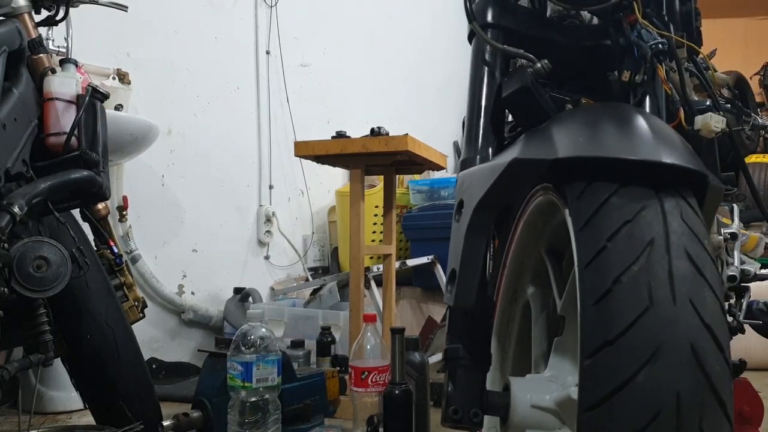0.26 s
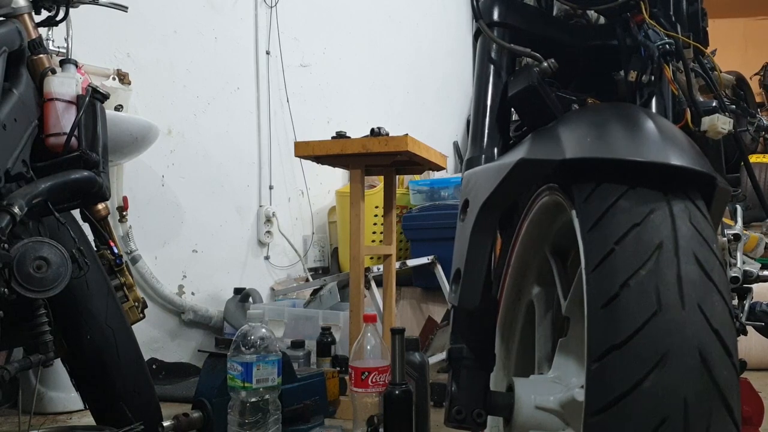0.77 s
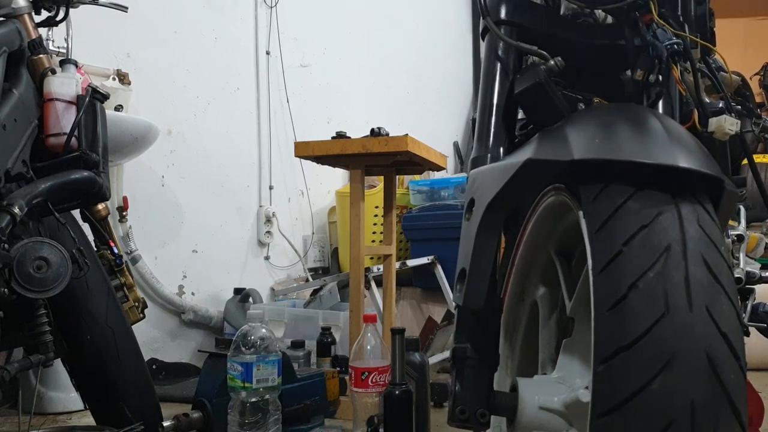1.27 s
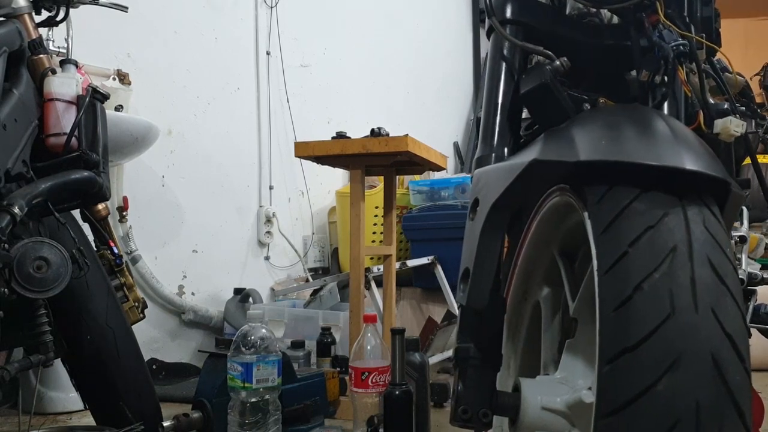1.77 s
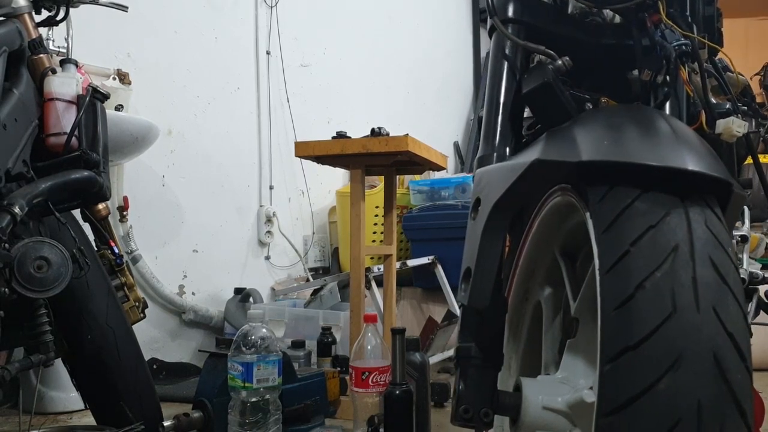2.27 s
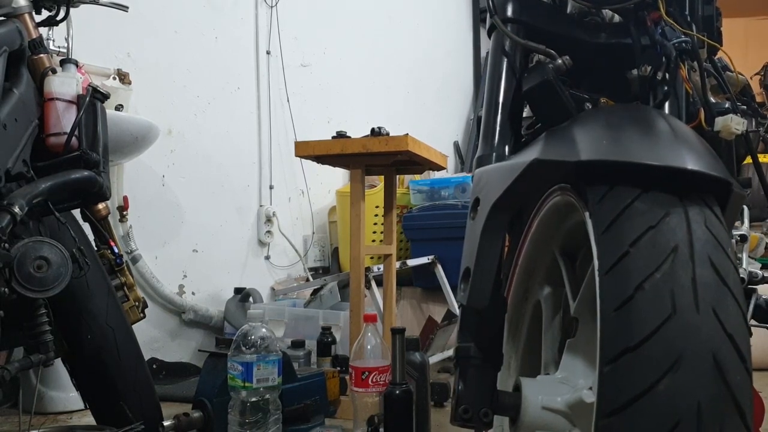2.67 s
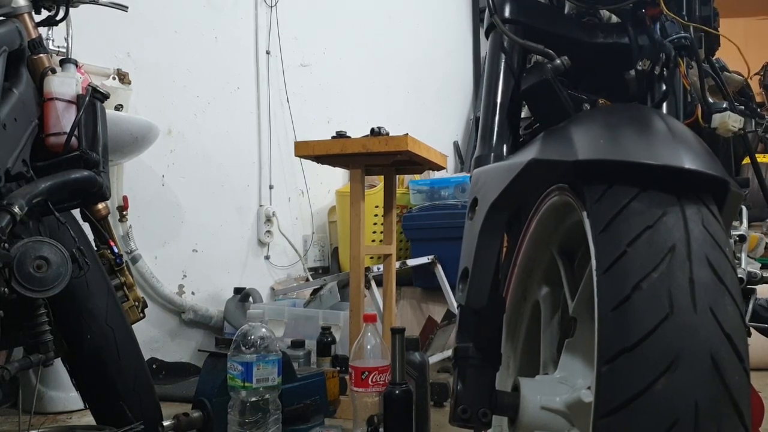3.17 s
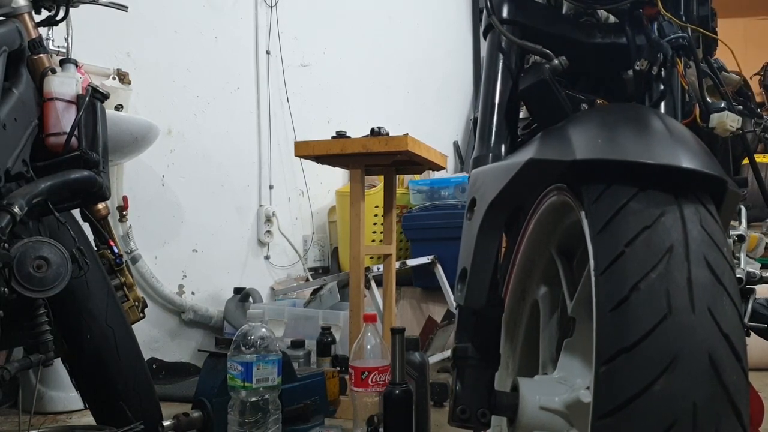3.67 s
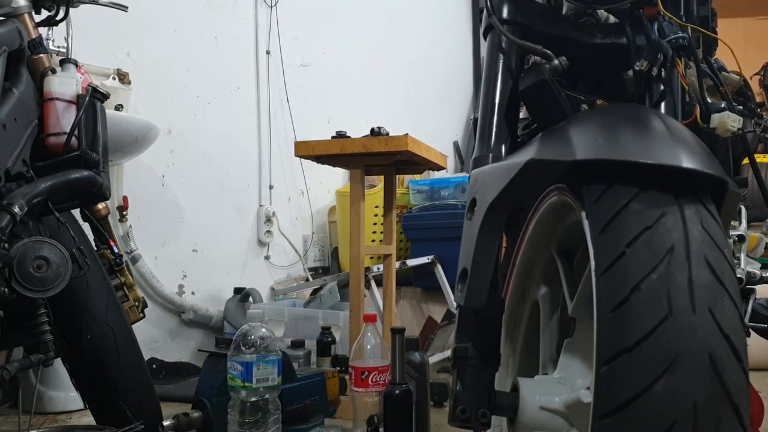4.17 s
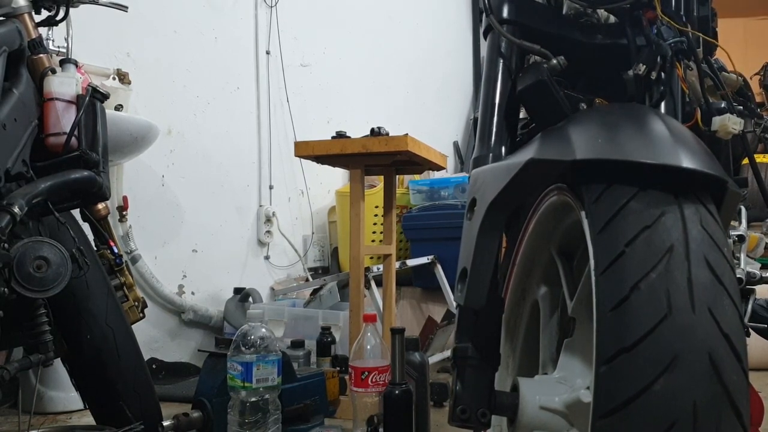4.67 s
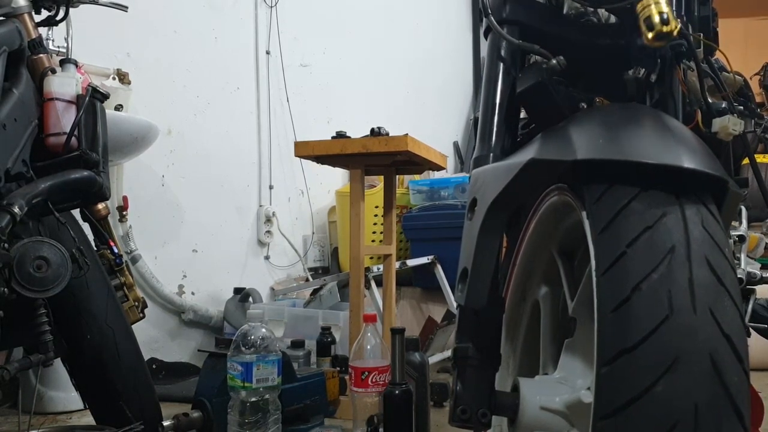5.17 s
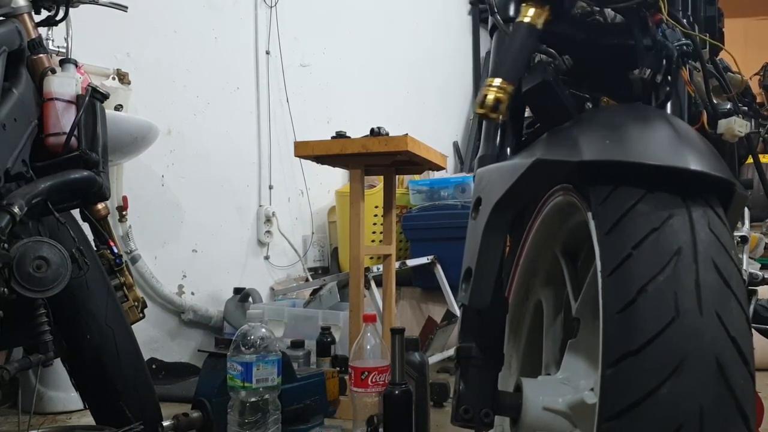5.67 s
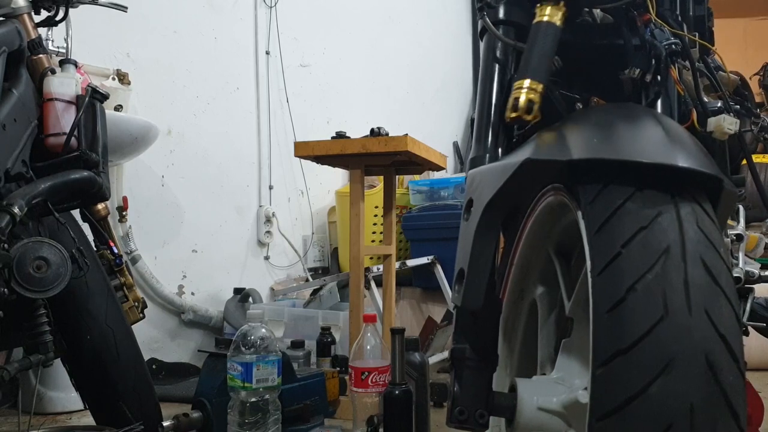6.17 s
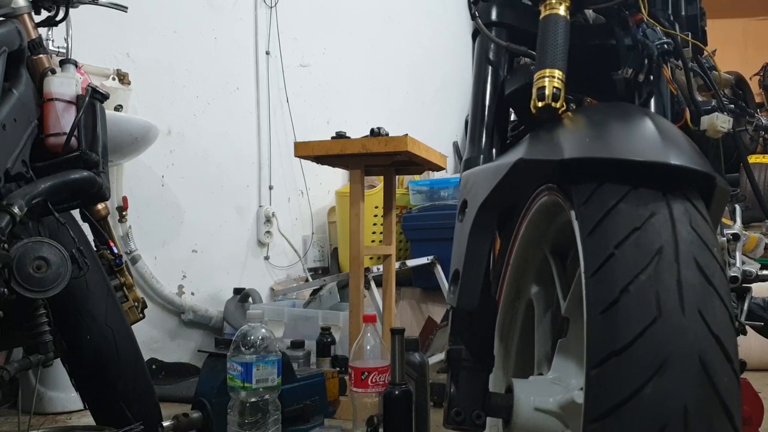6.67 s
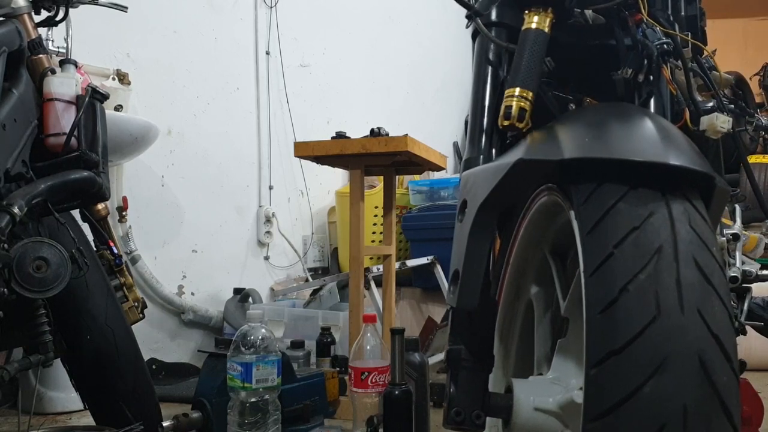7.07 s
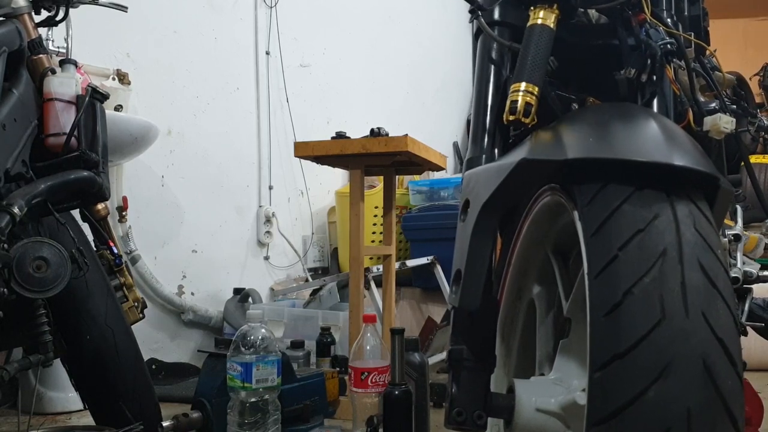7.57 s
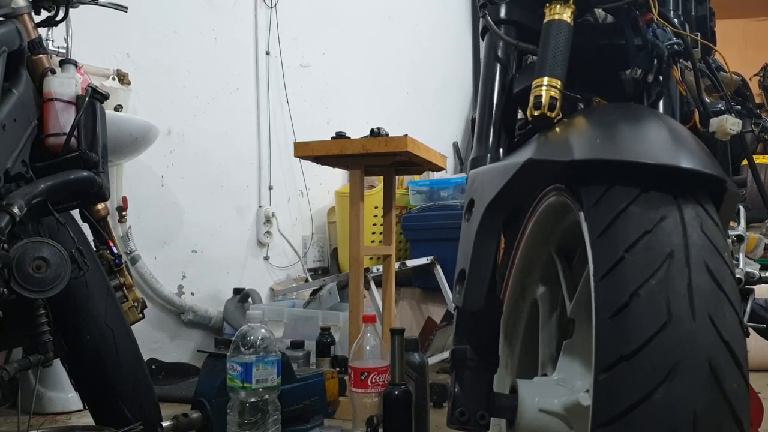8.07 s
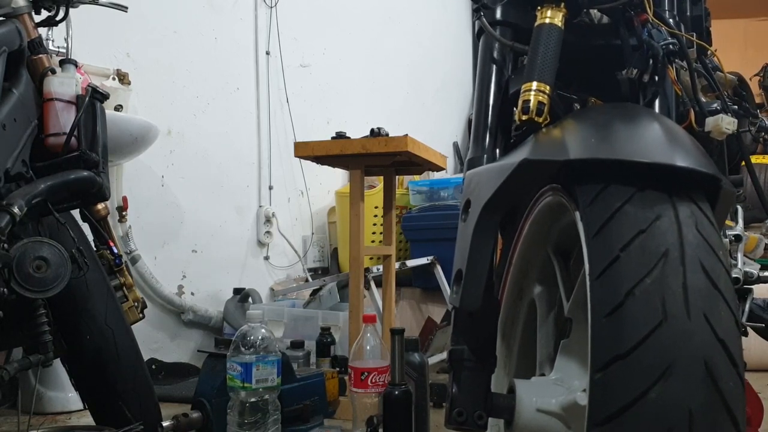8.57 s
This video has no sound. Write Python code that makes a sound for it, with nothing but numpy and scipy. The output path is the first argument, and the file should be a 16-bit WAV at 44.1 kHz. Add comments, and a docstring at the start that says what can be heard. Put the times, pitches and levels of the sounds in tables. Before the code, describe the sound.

Close in a hard-walled workshop, a motorcycle is handled with low bumps and knocks. The starter grinds and labours through compressions; the engine fires, thumps along briefly with hissing gas and mechanical chatter, then sputters out as the gears run down. A near-quiet pause follows, then a second, somewhat softer cranking with weak coughs, and the engine catches and idles to the end, deep, throaty and slightly uneven. Stereo.

```python
"""Twin-cylinder motorcycle starting in a workshop

The starter grinds, the engine catches, coughs and dies; a second cranking starts it and it idles.
Every firing sends a pulse and a turbulent puff through the exhaust resonances and blows a hiss of gas.
Starter, clatter, thuds and air are shaped noise; frame knocks are short tones with a dull tick."""
import sys
import numpy as np
from scipy import signal
from scipy.fft import rfft, irfft, next_fast_len
from scipy.io import wavfile
from scipy.ndimage import uniform_filter1d

SR = 44100
rng = np.random.default_rng(int(sys.argv[2]) if len(sys.argv) > 2 else 0)


def wav_out(sig):
    """Save sig, one row per channel (or a flat mono array), as 16-bit PCM at SR to the path in sys.argv[1]."""
    wavfile.write(sys.argv[1], SR, np.round(np.clip(np.atleast_2d(sig).T, -1, 1) * 32767).astype(np.int16))


N = 389422


def amp(db):
    """dB to gain."""
    return 10 ** (np.asarray(db) / 20)


def unit(x):
    """Scale to rms 1."""
    return x / np.sqrt(np.mean(x ** 2) + 1e-20)


def along(points, hz):
    """Interpolate (Hz, value) points on a log frequency axis."""
    point_hz, value = np.transpose(points)
    return np.interp(np.log(hz + 1), np.log(point_hz + 1), value)


def gains(tables, order):
    """Gain per sample from one dB column of several tables, silent outside them."""
    t = np.arange(N) / SR
    total = 0
    for table in tables:
        rows = np.array(table)
        total = total + amp(np.interp(t, rows[:, 0], rows[:, order], -200, -200))
    return total


def filtered(x, response):
    """Apply a complex response of frequency, zero-padded against wrap-around."""
    size = next_fast_len(N + SR // 2)
    hz = np.fft.rfftfreq(size, 1 / SR)
    return irfft(rfft(x, size) * response(hz), size)[..., :N]


def resonances(modes):
    """Causal sum of band-pass resonances, one response for each side."""
    def response(hz):
        total = 0
        for centre_hz, width_hz, left, right in modes:
            damping = 1j * hz * width_hz
            total = total + np.outer([left, right], damping / (centre_hz ** 2 - hz ** 2 + damping))
        return total
    return response


def rush(spectrum, patchy_db, size=(8, 8)):
    """Stereo noise of rms 1: shaped spectrum, random gain patches, frequency-dependent correlation."""
    # Each row: frequency in Hz, correlation between the sides.
    alike = [(30, 0.064), (80, 0.17), (400, 0.21), (1000, 0.05), (4000, 0.038)]
    z = signal.stft(rng.standard_normal((2, N)), nperseg=512)[2]
    field = uniform_filter1d(rng.standard_normal(z.shape[1:]), size[0], 0)
    field = uniform_filter1d(field, size[1], 1)
    pair = signal.istft(z * amp(patchy_db * unit(field)), nperseg=512)[1][:, :N]

    def mid_side(hz):
        angle = np.arccos(np.clip(along(alike, hz), -1, 1)) / 2
        return amp(along(spectrum, hz)) * [np.cos(angle), np.sin(angle)]

    mid, side = filtered(pair, mid_side)
    return unit(np.array([mid + side, mid - side]))


def spikes(s, gain):
    """One impulse at each time in seconds."""
    out = np.zeros(N + SR)
    out[np.round(s * SR).astype(int)] = gain
    return out[:N]


def firings(speed, load):
    """A firing at every whole crank turn: rows (s, gap s, bark dB, boom dB, hiss dB, clatter dB)."""
    (knots_s, rpm), load = np.transpose(speed), np.transpose(load)
    t = np.arange(knots_s[0], knots_s[-1] + .1, 1 / SR)
    turns = np.cumsum(np.interp(t, knots_s, rpm)) / 60 / SR
    last_turn = int(np.interp(knots_s[-1], t, turns))
    s = np.interp(np.arange(last_turn + 2), turns, t)
    levels_db = np.column_stack([np.interp(s[:-1], load[0], column) for column in load[1:]])
    cycle_scatter_db = 0.98  # every pair of firings burns a little differently
    burn_db = cycle_scatter_db * np.repeat(rng.standard_normal(levels_db.shape), 2, axis=0)
    return np.column_stack([s[:-1], np.diff(s), levels_db + burn_db[:len(levels_db)]])


def ring(s, gap_s, db, modes, rough, puff_s):
    """Pressure pulses, each with a decaying turbulent puff, through resonances; db is pulse rms over one gap."""
    def pipe(hz):
        high_cut = 1 + (hz / 820) ** 8
        low_cut = 1 + (62 / (hz + 1)) ** 8
        return resonances(modes)(hz) / high_cut / low_cut

    pipe_rms = np.sqrt(np.mean(abs(pipe(np.arange(SR // 2))) ** 2))
    blows = spikes(s, amp(db) * np.sqrt(gap_s * SR) / pipe_rms)
    fade = np.exp(-np.arange(SR // 5) / SR / puff_s)
    puffs = signal.fftconvolve(blows, fade / np.linalg.norm(fade))[:N] * rng.standard_normal(N)
    return filtered(blows + rough * puffs, pipe)


def exhaust(fire):
    """The sharp bark leaves the pipe first; the silencer's boom swells just after it."""
    # Weak lone firings and unburnt puffs. Each row: time in seconds, bark in dB, boom in dB (before scatter).
    coughs = [(0.513, -56, -31), (0.602, -57, -28.5), (0.681, -61, -34), (0.96, -33, -17),
              (2.332, -57, -21), (2.407, -50, -23.5), (2.507, -50.5, -27), (2.721, -67, -59),
              (3.67, -50, -34), (3.96, -63, -37), (4.006, -65, -36)]
    # Mode tables, low to high; boom includes room modes. Each row: centre in Hz, width in Hz,
    # relative left and right strength (sign = polarity).
    boom_modes = [(86, 9, 11, 10.8), (107, 10, -11.5, -11.8), (125, 10, -3.2, -3.3), (144, 10, -3.4, -4.3),
                  (176, 10, -2.5, -1.2)]
    throat_modes = [(254, 77, 5.4, 6.2), (273, 34, -6.2, -6.9), (317, 74, -2.9, -2.7)]
    bark_modes = [(356, 15, 4, 5.6), (406, 11, -5.6, -7), (435, 20, -5.6, -6.4), (487, 12, -2.4, -2.8),
                  (537, 11, 4, 3.5)]
    rasp_modes = [(650, 30, 1.6, 1.3), (669, 12, 2, 1.6), (694, 16, -1.2, 1.8)]
    edge_modes = [(796, 30, -.6, -.7), (890, 80, -.8, -.8), (1000, 120, .8, .8)]

    fire_s, fire_gap_s, fire_bark_db, fire_boom_db, _, clatter_db = fire.T
    lone_s, lone_bark_db, lone_boom_db = np.transpose(coughs)
    s = np.r_[fire_s, lone_s]
    gap_s = np.r_[fire_gap_s, np.full(len(lone_s), .06)]
    scatter = rng.standard_normal((len(s), 3))
    bark_db = np.r_[fire_bark_db, lone_bark_db] + 0.5 * scatter[:, 0]
    boom_db = np.r_[fire_boom_db, lone_boom_db] + .6 * scatter[:, 2]
    # throat grows more slowly once the bark is loud; rasp stops growing
    throat_db = np.minimum(bark_db + 0.5, 0.66 * bark_db - 12)
    rasp_db = np.minimum(bark_db - 6.5, -32) + scatter[:, 1]

    throat = ring(s, gap_s, throat_db, throat_modes, rough=.22, puff_s=.05)
    bark = ring(s, gap_s, bark_db - 1.2, bark_modes, rough=.25, puff_s=.06)
    rasp = ring(s, gap_s, rasp_db, rasp_modes, rough=.8, puff_s=.045)
    # edge follows the clatter level
    edge = ring(fire_s, fire_gap_s, clatter_db - 3, edge_modes, rough=0.89, puff_s=0.046)
    boom = ring(s + .0028, gap_s, boom_db, boom_modes, rough=.15, puff_s=.03)
    return throat + bark + rasp + edge + boom


def bursts(fire, db, rise_s, fall_s, floor, scatter_db):
    """Gain that swells after every firing, over a slower decay of relative size floor."""
    t = np.arange(SR // 4) / SR
    shape = (1 - np.exp(-t / rise_s)) ** 2 * (floor * np.exp(-t / 0.34) + np.exp(-t / fall_s))
    level = amp(db + scatter_db * rng.standard_normal(len(fire)))
    size = level * np.sqrt(fire[:, 1] * SR) / np.linalg.norm(shape)
    return signal.fftconvolve(spikes(fire[:, 0], size), shape)[:N]


def engine_noise(fire):
    """Gas hisses out at each firing with changing whistles; valves and chain clatter; gears whine; floor shakes."""
    # Noise spectra of gas, clatter and floor shake. Each row: frequency in Hz, relative density in dB.
    gas_spectrum = [(2650, -49), (4500, -7.5), (5300, -10), (6210, -4), (7470, 3), (7870, 0), (8560, -9.5),
                    (9370, -4), (10100, -5), (12100, -1), (14700, -5.5), (15900, -16)]
    clatter_spectrum = [(530, -1.5), (900, -7), (967, -6.5), (1350, -7.5), (1720, -5.5), (1900, -8.5),
                        (2320, -8), (2660, -11.5), (5000, -17), (6500, -18), (11000, -120)]
    shake_spectrum = [(18, -20), (30, -37), (50, 12.5), (70, 6.5), (90, -30)]
    # Gear whine. Each row: centre in Hz, width in Hz, relative left and right strength.
    whine_modes = [(1700, 18, 1.2, 1.2), (1911, 14, .6, .6), (3790, 20, .25, .25)]
    hiss_db, clatter_db = fire[:, 4], fire[:, 5]

    whistles = rush(gas_spectrum, patchy_db=3, size=(5, 5))
    gas_gain = bursts(fire, hiss_db - 1.5, rise_s=.006, fall_s=.018, floor=.08, scatter_db=2)

    gears = unit(filtered(rush([(500, 0), (5000, 0)], patchy_db=1), resonances(whine_modes)))
    rattle = unit(rush(clatter_spectrum, patchy_db=1.93) + 0.21 * gears)
    clatter_gain = bursts(fire, clatter_db - 1.5, rise_s=0.0053, fall_s=0.19, floor=1.0, scatter_db=0.4)

    shake_gain = bursts(fire, -42.5, rise_s=0.047, fall_s=0.14, floor=.4, scatter_db=1.5)
    shake = shake_gain * rush(shake_spectrum, patchy_db=1.0)
    return gas_gain * whistles + clatter_gain * rattle + shake


def labour(order):
    """Gain of starter layer 0 grind, 1 treble, 2 casing ring: steady part, compression surges and rundown."""
    # Starter runs. Each row: on in seconds, off in seconds, steady grind in dB.
    starter_runs = [(0.509, 1.417, -33), (3.503, 4.555, -39)]
    # Surges as the starter labours through each compression.
    # Each row: peak in seconds, then grind, treble and casing ring in dB.
    surge_rows = [(.53, -32, -33.5, -33), (.59, -25.5, -37, -25.5), (.79, -24.5, -30, -35),
                  (.905, -24, -32, -27), (1.08, -32, -30, -35), (1.23, -52, -40, -57),
                  (3.52, -57, -50, -61), (3.58, -36, -47, -31.5), (3.777, -33, -37, -37),
                  (3.872, -36, -36.5, -40), (3.914, -37, -63, -30.5), (4.066, -36.5, -35.5, -41),
                  (4.176, -27, -38, -34), (4.4, -36, -43, -46)]
    # Surge slopes in dB/s for grind, treble, casing ring.
    rise_db_per_s = (309, 702, 359)
    fall_db_per_s = (165, 231, 223)
    # The gear train coasts as the engine dies, jolts at the last kick and runs out.
    # Each row: time in seconds, then grind, treble and casing ring in dB.
    rundown = [
        [(2.3, -62, -54, -52), (2.36, -47, -64, -61), (2.57, -47, -47.5, -65), (2.618, -49, -53, -64),
         (2.628, -34, -38, -40), (2.68, -30, -47, -50), (2.76, -46.5, -55, -69), (2.92, -53.5, -73, -80),
         (3.02, -76, -87, -85)],
    ]
    over_grind_db = (0, -10.5, -13)[order]  # steady layers relative to the grind
    ramp_s, release_s = 0.014, 0.11

    t = np.arange(N) / SR
    steady, turning = 0, 0
    for on_s, off_s, db in starter_runs:
        gate = np.clip(np.minimum((t - on_s) / ramp_s, (off_s - t) / release_s), 0, 1)
        steady = steady + amp(db + over_grind_db) * gate
        turning = turning + gate
    surges = 0
    for row in surge_rows:
        u = t - row[0]
        slope_db = np.where(u < 0, rise_db_per_s[order] * u, -fall_db_per_s[order] * u)
        surges = surges + amp(row[1 + order] + slope_db)
    return steady + turning * surges + gains(rundown, order=1 + order)


def starter():
    """Gear teeth grind into the casing, whose resonances flare unevenly; the clutch rattles as it drops out."""
    # Grind and treble spectra. Each row: frequency in Hz, relative density in dB.
    grind_spectrum = [(240, -35), (400, -17.5), (558, -18), (885, -6.5), (1180, -6.5), (1320, -9.5),
                      (1960, -1), (2790, -10), (3930, -11), (5200, -20), (6760, -33), (11400, -120)]
    sizzle_spectrum = [(2820, -55), (4800, 1.5), (6580, 2), (7460, 3), (9110, -3), (13200, -6),
                       (15900, -12.5)]
    # Casing and clutch modes. Each row: centre in Hz, width in Hz, relative left and right strength.
    casing_modes = [(860, 51, 0.64, 0.14), (1113, 28, -0.27, -1.04), (1923, 23, 0.37, 0.86),
                    (3320, 45, -0.49, -0.38), (3947, 24, 1, 1.04), (4490, 350, -0.19, -0.29)]
    clutch_modes = [(1600, 90, .6, .6), (2000, 90, -1.1, -1.1), (4800, 150, .9, .9)]
    # Clutch drop-out: time in seconds, level in dB, 60 dB decay in seconds.
    stop_s, stop_db, stop_t60_s = (2.627, -30.5, 0.16)

    teeth = amp(4 * uniform_filter1d(rng.standard_normal(N), size=60) * np.sqrt(60))  # uneven contact
    grind = unit(rush(grind_spectrum, patchy_db=2, size=(4, 4)) * np.sqrt(teeth))
    sizzle = rush(sizzle_spectrum, patchy_db=1.2)
    excitation = teeth * rush([(500, 0), (5000, 0)], patchy_db=5, size=(3, 4))
    casing = unit(filtered(excitation, resonances(casing_modes)))
    out = labour(order=0) * grind + labour(order=1) * sizzle + labour(order=2) * casing

    t = np.arange(N) / SR - stop_s
    rattle = unit(filtered(rng.standard_normal(N), resonances(clutch_modes)))
    return out + (t > 0) * amp(stop_db - 60 * abs(t) / stop_t60_s) * rattle


def handling():
    """Lumpy thud noise, short tonal knocks on the frame, a brief treble hiss and steady air noise."""
    # The bike is handled, one table per spell. Each row: time in seconds, rumble in dB.
    rumble = [
        [(0, -34.5), (.1, -31.5), (.21, -28), (.3, -37.5), (.54, -31.5), (.85, -27), (.9, -36), (.96, -33)],
        [(2.55, -34), (2.76, -41.5), (2.85, -37.5), (2.92, -39.5), (3.32, -43), (3.365, -35), (3.42, -41.5),
         (3.62, -39.5), (3.68, -37), (4.01, -34), (4.17, -38.5), (4.21, -30)],
    ]
    # Thud and air spectra. Each row: frequency in Hz, relative density in dB.
    thud_spectrum = [(12, -38), (20, -8.5), (114, -2.5), (157, -6.5), (646, -25.5), (686, -25), (759, -20),
                     (823, -27), (1010, -28), (2500, -44), (3250, -84), (5500, -120)]
    air_spectrum = [(880, -33), (1500, -8), (3650, -8), (7950, -8.5), (9310, -23), (13300, -17),
                    (15900, -52)]
    # Frame knocks. Each row: time in seconds, level in dB before a common 3 dB lift, pitch in Hz.
    knocks = [(0.068, -34, 748), (0.106, -27, 1010), (0.141, -35, 980), (0.161, -32, 501),
              (0.182, -29, 740), (0.212, -37, 544), (0.264, -35, 900), (0.3, -36, 500), (0.448, -31, 710),
              (0.474, -31.5, 501), (2.793, -42, 1050), (2.856, -32.5, 1020), (2.899, -43, 530),
              (3.222, -43, 563), (3.453, -39, 509)]
    # Faint treble hiss: time in seconds, level in dB, length in seconds.
    hiss_s, hiss_db, hiss_length_s = (3.208, -55, 0.07)

    t = np.arange(N) / SR
    out = gains(rumble, order=1) * rush(thud_spectrum, patchy_db=3, size=(12, 3))
    out += amp(-68) * rush(air_spectrum, patchy_db=1)
    hiss = rush([(4000, -40), (5200, 0), (6500, -2), (8000, -4), (16000, -12)], patchy_db=3.5)
    out += amp(hiss_db) * hiss * (t > hiss_s) * np.exp(-((t - hiss_s) / hiss_length_s) ** 2)

    t = t[:SR // 10]
    dull = signal.butter(3, 1300, fs=SR)  # soft contact
    for s, db, hz in knocks:
        tick = 1.4 * signal.lfilter(*dull, rng.standard_normal((2, len(t)))) * amp(-60 * t / 0.047)
        tone = np.sin(2 * np.pi * hz * t) * amp(-60 * t / 0.014) * np.tanh(t / 0.00056)
        out[:, round(s * SR):][:, :len(t)] += amp(db + 3.0) * (tone + tick)
    return out


def workshop(x):
    """The walls answer with a noise tail in which each frequency dies at its own speed."""
    # Each row: frequency in Hz, 60 dB decay in seconds.
    walls = [(80, 0.97), (500, 0.23), (3000, 0.2)]
    # Each row: frequency in Hz, strength of the walls' answer in dB.
    wet = [(90, -16.5), (250, -12.5), (600, -10), (1000, -12.5)]
    sent = filtered(x, lambda hz: amp(along(wet, hz)))
    hz, t, z = signal.stft(rng.standard_normal((2, SR // 2)), SR, nperseg=256)
    tail = signal.istft(z * amp(-60 * t / along(walls, hz)[:, None]), SR, nperseg=256)[1]
    tail = tail / np.linalg.norm(tail[0])
    delayed = np.pad(sent, (300, 0))  # samples before the first reflection
    return signal.fftconvolve(delayed[None], tail, axes=1)[:, :N]


def scene():
    """Sum all sources; the exhaust reaches the right side slightly earlier and alone excites the walls."""
    # Crank speed, one table per run, one firing a turn. Each row: time in seconds, speed in rpm.
    speed_runs = [
        [(1.0717, 887), (1.34, 802), (1.47, 870), (1.66, 1015), (2.32, 1024)],
        [(4.2159, 939), (4.36, 801), (4.88, 1018), (5.23, 1006), (5.32, 961), (6.16, 954), (6.26, 1053),
         (6.58, 983), (6.92, 1054), (7.94, 1073), (8.34, 973), (8.44, 1054), (8.889, 1026)],
    ]
    # Firing levels as the engine settles, one table per run, before scatter and layer trims.
    # Each row: time in seconds, then bark, boom, gas hiss and clatter in dB.
    load_runs = [
        [(1.07, -25.5, -16, -37, -40), (1.35, -32, -15, -37, -34.5), (1.72, -25.5, -16, -38, -38),
         (2.0, -27, -17.5, -39.5, -38.5), (2.3, -27, -16.5, -40, -41.5)],
        [(4.21, -27, -14.5, -37.5, -34), (4.4, -30.5, -16, -40.5, -37), (4.85, -25.5, -15.5, -39, -37.5),
         (5.1, -28, -16.5, -40, -39.5), (5.4, -28, -15.5, -39.5, -40), (6.1, -28.5, -16.5, -40, -39.5),
         (6.3, -25.5, -17, -39.5, -40), (6.56, -26.5, -14.5, -41.5, -40), (6.58, -18.5, -15.5, -41, -40),
         (7.2, -20, -17, -42, -43), (7.8, -20.5, -16, -45, -43), (8.3, -22.5, -16, -46.5, -46),
         (8.85, -21.5, -16.5, -44.5, -43.5)],
    ]
    fire = np.vstack([firings(speed, load) for speed, load in zip(speed_runs, load_runs)])
    pipe = exhaust(fire)
    lag_s = .00018  # left behind right
    sides = np.array([[1], [-1]])
    direct = filtered(pipe, lambda hz: np.exp(-1j * np.pi * hz * lag_s * sides))
    return direct + workshop(pipe.mean(0)) + engine_noise(fire) + starter() + handling()


def record(dry):
    """The microphone keeps nothing above its band limit."""
    top_hz = 15900
    return filtered(dry, lambda hz: hz < top_hz)


dry = scene()
out = record(dry)
wav_out(out)
```